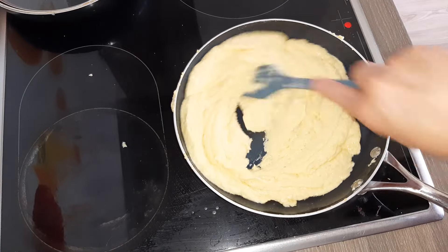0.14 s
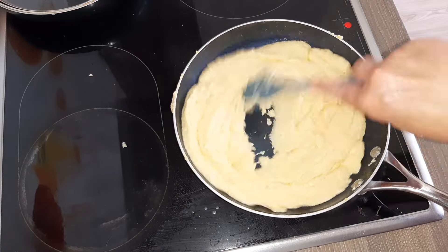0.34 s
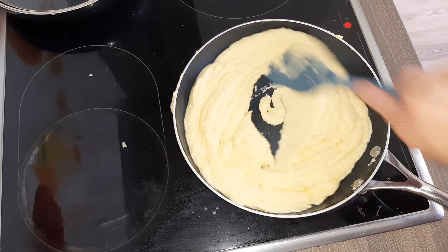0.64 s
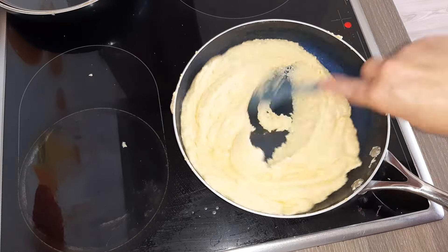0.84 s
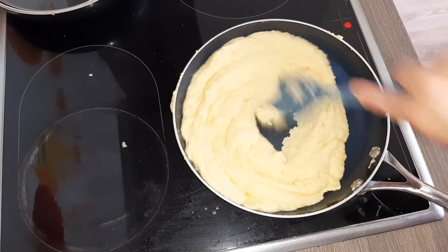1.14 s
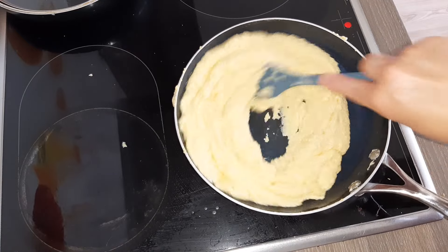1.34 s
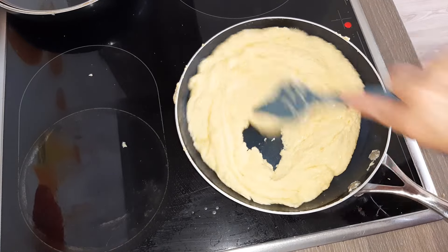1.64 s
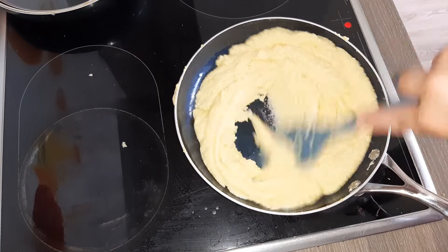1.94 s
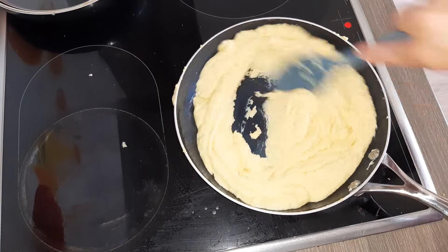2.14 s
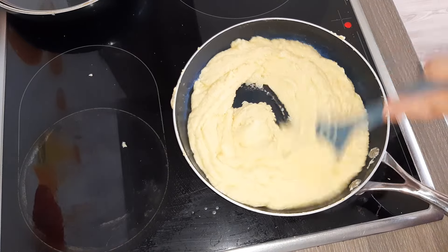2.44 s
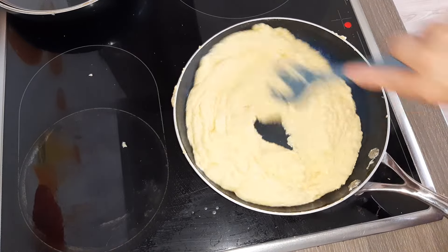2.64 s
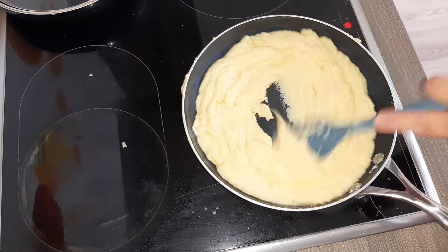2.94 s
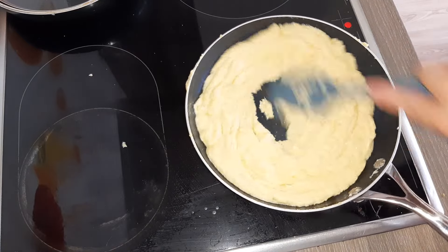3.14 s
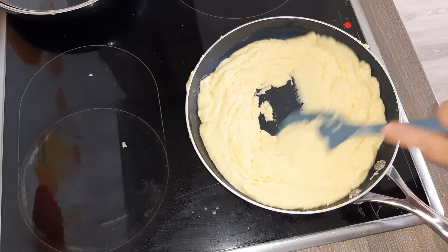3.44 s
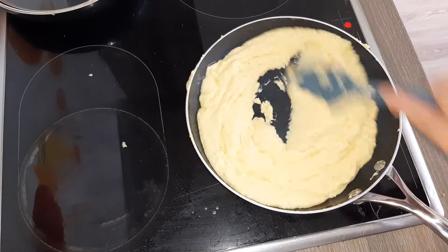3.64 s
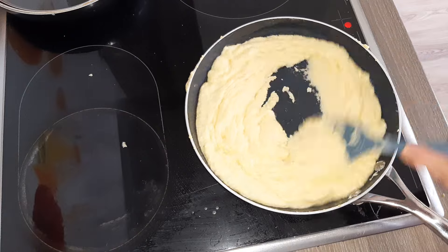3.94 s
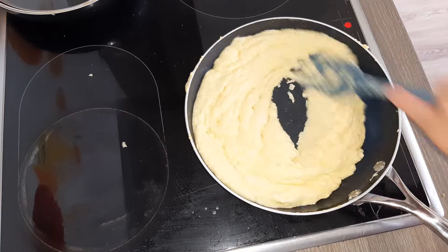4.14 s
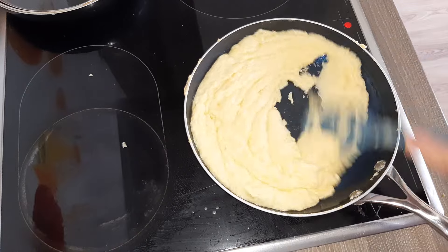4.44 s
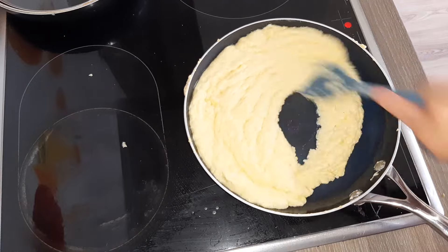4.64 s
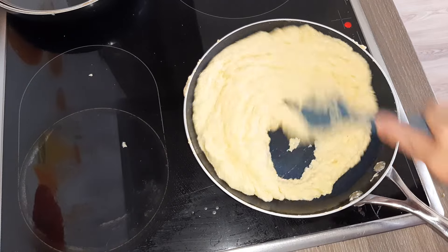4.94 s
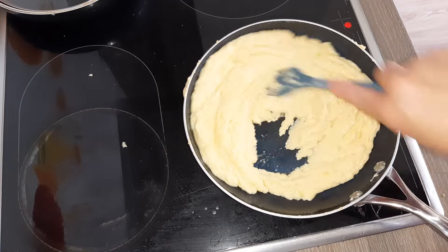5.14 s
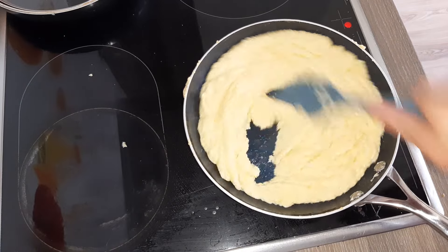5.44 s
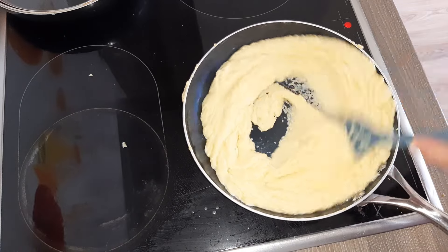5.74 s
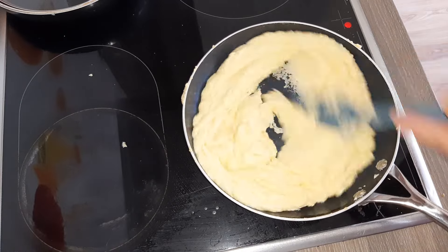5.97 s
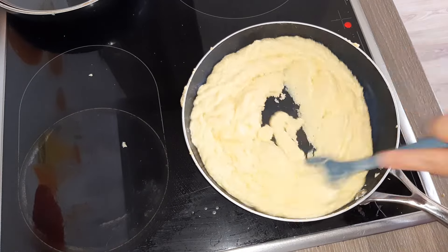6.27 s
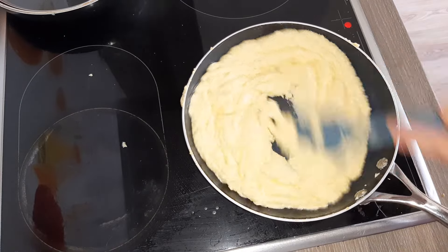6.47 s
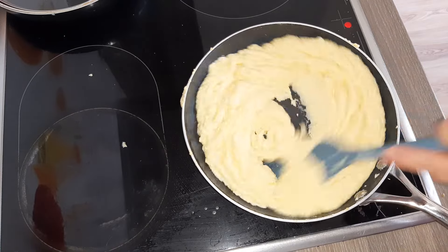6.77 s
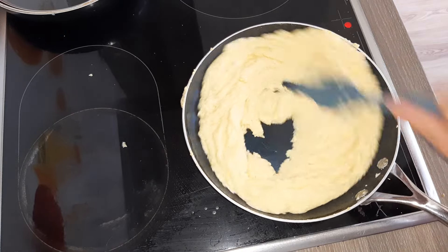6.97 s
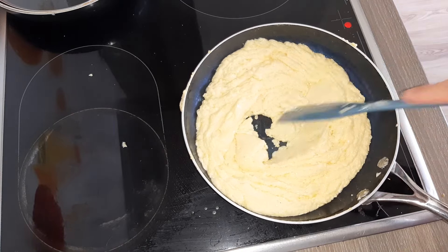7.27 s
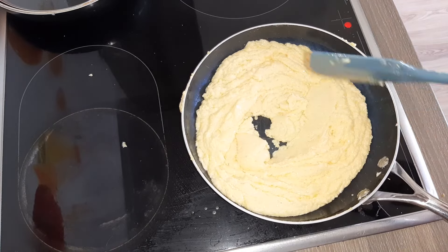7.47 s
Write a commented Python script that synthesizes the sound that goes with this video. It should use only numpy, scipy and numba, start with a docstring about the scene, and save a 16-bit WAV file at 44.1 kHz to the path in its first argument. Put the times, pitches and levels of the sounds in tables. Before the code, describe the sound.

Close stereo pickup over a hot pan in a small, quiet kitchen, with a short, faint room tail. From the first instant a soft spatula works thick porridge in rapid pushes, roughly four a second in uneven pairs. Each gives a sticky mid-pitched squelch with crackly tearing, a deeper smack and a brief bright sizzle of tiny bursts. A low pan rumble accompanies the shoves. A snappy pop comes near 1.25 s, around dull thuds at 1.1 and 1.2. Stirring continues evenly, with small pops clustering near 2.5. At 4.35 the pan lands with the hardest knock, a quick double clack, followed by softer thuds at 4.9 and 5.2. Faint airy squeaks slip out occasionally, notably near 6.1 and 7.1. Wet pops thicken after 6, the strongest at 6.7 and another at 7.2. Then the blade lifts and the last fizz dies into near silence by 7.6.

```python
"""In a small kitchen, close above a hot frying pan on a glass hob, a silicone spatula stirs thick porridge.
Each push tears the sticky mass: random clicks make the tearing, small ringing cavities make the squelch
and the pops, and clicks with short pings make the wet sizzle. Sliding tones are air squeaking out.
The dragged pan rumbles and, when it rocks, knocks: both set off the same ringing modes of the pan.
At the end the spatula is lifted and the last fizz fades into the faint air of the room."""
import sys
import numpy as np
from scipy import signal
from scipy.fft import rfft, irfft
from scipy.io import wavfile
from scipy.ndimage import uniform_filter1d
from numba import njit

SR = 44100
rng = np.random.default_rng(int(sys.argv[2]) if len(sys.argv) > 2 else 0)


def dump_mix(stems):
    """Bounce the given channels to the path in sys.argv[1] as a 16-bit WAV at rate SR."""
    frames = np.atleast_2d(stems).T  # one column per channel
    limited = np.clip(frames, -1, 1)  # hard clip at full scale
    pcm = np.round(limited * 32767).astype(np.int16)
    wavfile.write(sys.argv[1], SR, pcm)


N = 335535
TIME = np.arange(N) / SR  # seconds


def undb(db):
    """Turn decibels into a gain."""
    return 10 ** (np.asarray(db) / 20)


def unit(x):
    """Scale a sound to an rms of 1."""
    return x / np.sqrt(np.mean(x ** 2))


def curve(rows, axis=1):
    """Join one column of a table by straight lines in time."""
    rows = np.asarray(rows)
    return np.interp(TIME, rows[:, 0], rows[:, axis])


def sides(pan_db):
    """Left and right gains; a positive number of dB makes the left louder."""
    return undb(np.array([[.5], [-.5]]) * pan_db)


def add(out, at, sound):
    """Mix a short sound in at a time in seconds."""
    i = max(int(at * SR), 0)
    out[:, i:i + sound.shape[1]] += sound[:, :max(N - i, 0)]


def convolve(x, response):
    """Pass a sound through an impulse response."""
    return signal.fftconvolve(np.atleast_2d(x), np.atleast_2d(response), axes=1)[:, :N]


def low_pass(x, order, hz):
    """Dull a sound above a frequency."""
    return signal.sosfilt(signal.butter(order, hz, fs=SR, output="sos"), x)


def high_pass(x, order, hz):
    """Thin a sound below a frequency."""
    return signal.sosfilt(signal.butter(order, hz, "high", fs=SR, output="sos"), x)


def colour(x, points, size=1024):
    """Filter a sound to a spectrum of (Hz, dB) points, without any sound before its cause."""
    hz, db = np.transpose(points)
    grid = np.arange(size // 2 + 1) * SR / size
    gain = undb(np.interp(np.log(grid + 1), np.log(hz), db))
    # folding the cepstrum forward in time gives the minimum-phase response
    cepstrum = irfft(np.log(gain))
    cepstrum[1:size // 2] *= 2
    cepstrum[size // 2 + 1:] = 0
    return convolve(x, irfft(np.exp(rfft(cepstrum))))


def clicks(rate, spread_db):
    """Random clicks of either sign, rate per second, with sizes scattered in dB."""
    size = undb(spread_db * np.minimum(rng.exponential(size=N), 4))
    return (rng.random(N) < rate / SR) * size * rng.choice([-1, 1], N)


def walk(rate):
    """Random levels of rms 1, rate new ones per second, smoothed into slopes."""
    held = rng.standard_normal(8192)[(TIME * rate).astype(int) % 8192]
    return unit(uniform_filter1d(held, max(int(SR / rate), 1)))


def spurts(rate, decay_s, depth_db):
    """Gain of rms 1 that jumps at random moments and falls back within milliseconds."""
    jumps = (rng.random(N) < rate / SR) * rng.exponential(size=N)
    power = signal.lfilter([1], [1, -np.exp(-1 / (decay_s * SR))], jumps)
    return unit(np.sqrt(1 + undb(depth_db) ** 2 * power))


def swells(events, attack_s, release_s):
    """Power of (start, length, dB) gestures that rise up to the start, hold and die away."""
    power = np.zeros((1, N))
    for at, length, db in events:
        start = max(at - attack_s, 0)
        t = np.arange(int((attack_s + length + 6 * release_s) * SR)) / SR + start - at
        rise = np.clip(1 + t / attack_s, 0, 1) ** 2
        fall = np.exp(-np.maximum(t - length, 0) / release_s)
        add(power, start, (undb(db) * (rise * fall)[None]) ** 2)
    return power[0]


@njit
def bubbles(push, hz, cycles, glide, pan):
    """Every click rings a small cavity whose pitch rises as it opens."""
    out = np.zeros((2, len(push)))
    for i in np.nonzero(push)[0]:
        length, phase = int(cycles[i] * SR / hz[i]), 0.
        for k in range(min(length, len(push) - i)):
            phase += 2 * np.pi * hz[i] / SR * (1 + glide * k / length)
            v = push[i] * np.exp(-6 * k / length) * np.sin(phase) / np.hypot(pan[i], 1 / pan[i])
            out[0, i + k] += v * pan[i]
            out[1, i + k] += v / pan[i]
    return out


def splash(t60_s=0.019, wet_db=-3, size=1024):
    """Direct sound and its quick reflections in the pan, drawn afresh at every call."""
    t = np.arange(size) / SR
    early = rng.standard_normal((2, size)) * np.exp(-np.log(1000) * t / t60_s) * (t > .0003)
    response = undb(wet_db) * unit(early) / np.sqrt(size)
    response[:, 0] += 1
    return response / np.sqrt(1 + undb(wet_db) ** 2)


def wander(x, wet_db, size=1024):
    """The source moves about the pan, so overlapping slices get different reflections."""
    out, fade = np.zeros((2, N)), signal.get_window("hann", 2 * size)
    for i in range(0, N - 2 * size, size):
        piece = x[:, i:i + 2 * size] * fade
        add(out, i / SR, signal.fftconvolve(piece, splash(wet_db=wet_db), axes=1))
    return out


# The faint air of the room. Each row: frequency in Hz, relative strength in dB.
AIR_SPECTRUM = [(30, 5), (110, -0.5), (250, -0.5), (600, -14.5), (2000, -15.5), (6000, -27.5), (16000, -16)]


def room_tone(level_db=-72):
    """Steady kitchen air: coloured noise, partly shared by both sides."""
    shared = rng.standard_normal(N)
    separate = 1.3 * rng.standard_normal((2, N))
    return unit(colour(shared + separate, AIR_SPECTRUM)) * undb(level_db)


# Pushes of the blade that tear the mass and wet the hot metal. Levels are before the mix.
# Each row: start of full strength in seconds, length in seconds, tearing level in dB,
# middle pitch of the air pockets in Hz, deep smack in dB relative to the tearing, sizzle level in dB,
# top of the sizzle in dB relative to its lower part.
PUSHES = [(0.01, 0.05, -75.5, 3940, -3, -52, -8), (0.061, 0.045, -56, 2390, -8, -63, 3),
          (0.149, 0.027, -47.5, 3880, -7.5, -51, -5), (0.317, 0.013, -51.5, 3870, -11, -51.5, -9),
          (0.364, 0.042, -55.5, 2750, -10, -54.5, -4), (0.545, 0.034, -57.5, 3730, -6, -53.5, 4),
          (0.626, 0.058, -50, 3740, -6.5, -53.5, 8), (0.804, 0.014, -51, 2000, 0, -46, 4),
          (0.877, 0.048, -55, 2740, -6, -66, 0), (1.01, 0.061, -53.5, 2380, -5, -49.5, 8),
          (1.115, 0.045, -60.5, 2260, -12, -62, -5), (1.253, 0.031, -56.5, 2320, -12, -55.5, -5),
          (1.34, 0.03, -51.5, 3960, -9.5, -52.5, -1), (1.494, 0.034, -53, 2300, -8, -49.5, 3),
          (1.565, 0.045, -53, 4170, -16, -58, 10), (1.759, 0.021, -59.5, 4000, -10, -50, 6),
          (1.826, 0.057, -57, 3280, -16, -56, -3), (2.014, 0.036, -59.5, 3900, 1, -55, 4),
          (2.085, 0.086, -67.5, 3580, -11, -57, 3), (2.293, 0.028, -56.5, 2920, 0, -57.5, -2),
          (2.355, 0.027, -56, 2360, -24, -58, 3), (2.504, 0.079, -53, 1920, -1, -64, -6),
          (2.588, 0.056, -53.5, 2200, -19, -59, 1), (2.747, 0.03, -59, 4170, -5, -54, -4),
          (2.819, 0.055, -52.5, 1900, -13, -55.5, -6), (2.93, 0.12, -61, 2130, -7, -56, -2),
          (3.058, 0.072, -56, 3110, -2, -53, 0), (3.262, 0.025, -55, 4460, -8, -56.5, 5),
          (3.326, 0.048, -52, 2610, -7.5, -54, 2), (3.525, 0.028, -59.5, 3400, -9, -57, -4),
          (3.59, 0.042, -57.5, 2580, -28, -59, 6), (3.747, 0.049, -58, 2100, -5, -55, 1),
          (3.849, 0.062, -53.5, 2820, -2.5, -54.5, -4), (4.034, 0.01, -53, 2970, 0.5, -55, -8),
          (4.112, 0.039, -57.5, 2220, -7, -60, 3), (4.309, 0.12, -55, 2070, -3.5, -59, -3),
          (4.53, 0.063, -53, 2000, -1.5, -53, -1), (4.625, 0.063, -55, 2370, -10, -55.5, -6),
          (4.783, 0.042, -53, 3290, -10.5, -57, -1), (4.915, 0.016, -49, 2250, 1, -60, -1),
          (5.052, 0.023, -55.5, 2920, -14, -53.5, 8), (5.11, 0.068, -57.5, 2310, -28, -63, -12),
          (5.293, 0.03, -63.5, 2870, -21, -51, 7), (5.342, 0.059, -54.5, 2840, -2, -59.5, -4),
          (5.574, 0.036, -55.5, 2160, -3, -53, 5), (5.638, 0.032, -52.5, 3800, -12, -51, -4),
          (5.843, 0.028, -55.5, 2140, 1.5, -53.5, -4), (5.905, 0.061, -56.5, 1900, -3, -54.5, 0),
          (6.066, 0.15, -61, 2020, -8.5, -55, -2), (6.262, 0.088, -72.5, 4440, 7, -52.5, 1),
          (6.349, 0.1, -57, 2170, -0.5, -67, 1), (6.513, 0.089, -60.5, 4260, -8, -52, 1),
          (6.649, 0.065, -53.5, 2370, -10, -50.5, -3), (6.834, 0.043, -55.5, 2790, -6.5, -55, -3),
          (6.913, 0.032, -48.5, 3730, -10, -50.5, 0), (7.005, 0.043, -60, 3050, -6.5, -57.5, 13),
          (7.104, 0.047, -55.5, 2120, -21, -56.5, -5), (7.18, 0.053, -56, 2100, -5.5, -55, 3)]


def pocket_pitch(rise_oct_per_s=1.1):
    """Every tear has its own resonance, which rises while it opens."""
    points = []
    for at, length, _, hz, *_ in PUSHES:
        rise = 2 ** (rise_oct_per_s * length / 2)
        points += [(at, hz / rise), (at + length, hz * rise)]
    return curve(sorted(points))


def air_pockets(rate, cycles, scatter, glide=0.17):
    """Small cavities ring around the pitch of the push, each gliding up as it opens."""
    hz = np.clip(pocket_pitch() * np.exp(scatter * rng.standard_normal(N)), 400, 12000)
    lengths = cycles * np.exp(0.26 * rng.standard_normal(N))
    pushes = clicks(rate, spread_db=4.0)
    return unit(bubbles(pushes, hz, lengths, float(glide), undb(9.7 * rng.standard_normal(N))))


# What goes on between the pushes until the spatula is lifted, before the offsets and the mix.
# Each row: time in seconds, sizzle level in dB, tearing level in dB.
BETWEEN_PUSHES = [(0.0, -60, -58.5), (0.36, -58, -64.5), (0.97, -55.5, -61.5), (2.2, -64.5, -65.5),
                  (2.64, -54.5, -64.5), (2.94, -56.5, -57.5), (3.37, -61.5, -68), (4.8, -53.5, -64.5),
                  (5.42, -62.5, -71), (6.03, -55.5, -65), (6.73, -56.5, -61.5), (7.09, -56, -81),
                  (7.37, -68.5, -76), (7.6, -101, -95)]
# Tone of the snapping threads. Each row: frequency in Hz, relative strength in dB.
TEAR_SPECTRUM = [(300, -21), (700, -22.5), (1200, -14), (2100, 2), (3000, -6), (4300, -2.5), (6500, -26.5),
                 (12000, -31.5)]
# Tone of the deep smack. Each row: frequency in Hz, relative strength in dB.
SMACK_SPECTRUM = [(120, -4.5), (300, -15.5), (500, -8), (750, -1.5), (1050, 3), (1500, -6), (3000, -31)]


def squelch(tear_db=-0.5, pocket_db=-3, smack_db=-2, clump_db=0.1):
    """Sticky threads snap in clumps, air pockets open, and a deep cut smacks."""
    attack_s, release_s = 0.023, 0.018  # a tear builds up, holds while the blade pushes, and stops
    at, length, db, _, deep_db, _, _ = np.transpose(PUSHES)
    lull = undb(curve(BETWEEN_PUSHES, axis=2) - 4)
    deep_lull = lull * undb(-1)
    tearing = np.sqrt(swells(zip(at, length, db), attack_s, release_s) + lull ** 2)
    cutting = np.sqrt(swells(zip(at, length, db + deep_db), attack_s, release_s) + deep_lull ** 2)
    tears = undb(tear_db) * unit(colour(clicks(2600, spread_db=5.0), TEAR_SPECTRUM))
    pockets = undb(pocket_db) * air_pockets(rate=1400, cycles=12.3, scatter=0.24)
    smack = undb(smack_db) * unit(colour(clicks(1600, spread_db=3.5), SMACK_SPECTRUM))
    mass = ((tears + pockets) * tearing + smack * cutting) * undb(clump_db * walk(110))
    mass = mass * spurts(rate=70, decay_s=0.0031, depth_db=6)
    return wander(mass * sides(2.75), wet_db=1.5)


# Tone of the sizzle. Each row: frequency in Hz, relative strength in dB.
SIZZLE_SPECTRUM = [(800, -26), (2500, -10.5), (4500, -1.5), (6000, -1.5), (8000, -3), (11500, -1),
                   (14000, -3), (16000, -13)]


def sizzle(level_db=0, rate=3500, apart=3.2, flicker_db=2.04, ping_db=-7, split_hz=9800):
    """Tiny steam bubbles burst as clicks all over the pan, most around each push; some of them ping."""
    at, length, _, _, _, db, top_db = np.transpose(PUSHES)
    lull = undb(curve(BETWEEN_PUSHES) - 1)

    def steam(levels):
        """Freshly wetted metal hisses up, and stops when porridge flows back over it."""
        return np.sqrt(swells(zip(at, length, levels), attack_s=0.075, release_s=0.0033) + lull ** 2)

    middle, left, right = (clicks(rate, spread_db=2.5) for _ in range(3))
    bursts = unit(middle + apart * np.array([left, right]))
    hz = rng.uniform(4000, 15000, N)
    ping_clicks = clicks(500, spread_db=0.0)
    pings = bubbles(ping_clicks, hz, np.full(N, 14.), 0.044, undb(17.0 * rng.standard_normal(N)))
    fizz = unit(colour(bursts + undb(ping_db) * unit(pings), SIZZLE_SPECTRUM))
    # the top and the lower part of the sizzle follow their own levels
    lower = signal.sosfiltfilt(signal.butter(2, split_hz, fs=SR, output="sos"), fizz)
    fizz = lower * steam(db - top_db / 2) + (fizz - lower) * steam(db + top_db / 2)
    fizz = fizz * spurts(rate=63, decay_s=0.0044, depth_db=1.5)
    return wander(fizz * undb(level_db + flicker_db * walk(90)) * sides(1.9), wet_db=1)


# How the pan rings on the glass plate, before any damping.
# Each row: frequency in Hz, relative level in dB, time to fall by 60 dB in seconds.
PAN_MODES = [(42, -22, 0.32), (66.7, -6.5, 0.38), (76.5, -13, 0.28), (109.4, 1, 0.29), (129.7, -1.5, 0.23),
             (152, -11, 0.16), (191.5, -6, 0.15), (242.6, -10.5, 0.21), (287.7, -5, 0.14),
             (336.5, -7, 0.11), (390, -6, 0.027), (484.5, -5.5, 0.11), (537.6, -11.5, 0.25),
             (622, -2.5, 0.056), (748, -15, .12), (870, -24, 0.15), (1064, -8, 0.058), (4040, -32, 0.13)]


def pan_ring(left_db=5.3, lag=.3, size=22050):
    """Ringing of the pan; neighbouring modes swing in opposite directions, the right lags (radians)."""
    t, phase = np.arange(size) / SR, np.array([[0], [lag]])
    ring = np.zeros((2, size))
    for k, (hz, db, t60) in enumerate(PAN_MODES):
        swing = (-1) ** k * undb(db) * np.sin(2 * np.pi * hz * t - phase)
        ring += swing * np.exp(-np.log(1000) * t / t60)
    return ring * sides(left_db)


def damped(ring, damping_s):
    """The ring of the pan stilled faster by what touches it."""
    return ring * np.exp(-TIME[:ring.shape[1]] / damping_s)


# The blade drags the pan over the hob.
# Each row: start of full strength in seconds, length in seconds, level in dB.
DRAGS = [(0.01, 0.058, -59), (0.15, 0.1, -63.5), (0.345, 0.16, -59), (0.66, 0.039, -57.5),
         (0.83, 0.21, -64), (1.09, 0.22, -63), (1.525, 0.11, -62.5), (1.77, 0.016, -63),
         (1.865, 0.063, -62), (2.26, 0.24, -70.5), (2.51, 0.21, -63.5), (2.77, 0.15, -61.5),
         (3.115, 0.038, -66), (3.37, 0.031, -59.5), (3.775, 0.04, -64.5), (3.87, 0.099, -60),
         (4.13, 0.041, -61), (4.55, 0.068, -58), (5.27, 0.07, -63), (5.665, 0.082, -60.5),
         (5.93, 0.15, -60.5), (6.18, 0.16, -67), (6.415, 0.1, -59), (6.945, 0.06, -59.5),
         (7.195, 0.028, -57.5), (7.435, 0.013, -64.5)]


def rumble(ring, level_db=0, soft_hz=120):
    """The soft blade sticks and slips on the base, hardest in the shoves; hand and porridge damp the ring."""
    slips = low_pass(clicks(300, spread_db=-2), 1, soft_hz)
    body = unit(convolve(slips, damped(ring, damping_s=0.13)))
    lull = undb(curve(BETWEEN_PUSHES, axis=2) - 6.5)
    drag = np.sqrt(swells(DRAGS, attack_s=.04, release_s=0.029) + lull ** 2)
    return body * drag * undb(level_db)


def cavity(x, hz, q=3.4, soft_hz=4300):
    """A small cavity rings at its pitch, radiates little below it, and soft walls dull the top."""
    x = high_pass(x, 6, min(0.61 * hz, SR / 3))
    ring = signal.lfilter(*signal.iirpeak(min(hz, SR / 3), q, fs=SR), x)
    return ring + undb(-8.5) * low_pass(x, 3, soft_hz)


# The loudest short cracks: bursting pockets, blade slaps, brief clumps of tearing,
# and the crack of a pan knock. Levels are before the mix.
# Each row: time in seconds, ringing pitch in Hz, ringing level in dB, snap level in dB,
# left minus right in dB, fading time of the crackle in seconds.
SHORT_CRACKS = [(0.039, 6730, -40.5, -70, -2, 0.00066), (0.155, 2700, -42, -43, 3, 0.0026),
                (0.324, 2340, -51.5, -44.5, 1, 0.00092), (0.384, 2270, -45.5, -59, 3, 0.0034),
                (0.646, 4870, -41.5, -51, 0, 0.0048), (0.814, 1780, -43.5, -57, 7, 0.017),
                (1.052, 1600, -47, -64, 2, 0.0045), (1.076, 3900, -43.5, -65, -2, 0.0028),
                (1.247, 2210, -38, -34, 2, 0.0011), (1.507, 1080, -52, -52, 3, 0.011),
                (1.57, 4230, -59, -45.5, -4, 0.015), (1.7603, 4870, -50, -43.5, 0, 0.0057),
                (2.016, 4440, -59, -51.5, 3, .0014), (2.317, 2560, -42, -69, 3, .003),
                (2.459, 2360, -50.5, -49, 5.5, 0.017), (2.493, 2450, -56, -44, 2, 0.0022),
                (2.5, 2470, -45, -47.5, 4, 0.017), (2.518, 3480, -43, -58, 3, 0.0068),
                (2.555, 1680, -47.5, -68, 0, 0.0025), (2.617, 1960, -39.5, -48.5, 0, 0.00095),
                (2.754, 6300, -42.5, -54, 1, 0.0053), (2.829, 1770, -42.5, -64, -2, 0.0083),
                (3.065, 5320, -46.5, -66, -2, .002), (3.091, 2640, -66, -45, -4, 0.0019),
                (3.272, 4150, -49, -62, 0, 0.0037), (3.794, 1960, -50, -68, 4, 0.0023),
                (3.865, 2170, -45.5, -58, -3, 0.0044), (3.895, 1110, -41, -70, 4, 0.0022),
                (4.043, 2070, -47, -49, 3, 0.0033), (4.127, 1010, -45.5, -53, -1, 0.0015),
                (4.342, 960, -43.5, -60, 3, 0.014), (4.392, 1000, -38, -41, -1.5, 0.0026),
                (4.437, 3780, -60, -48.5, 6, 0.0033), (4.679, 870, -40.5, -63, 2, 0.0044),
                (4.9156, 1040, -43, -43.5, -1, 0.0041), (5.062, 2650, -45.5, -56, 3, 0.0023),
                (5.306, 2670, -50, -61, 5, .0025), (5.854, 1950, -48, -64, 5, 0.0085),
                (5.904, 3500, -71, -49, -2, 0.0022), (5.418, 940, -46.5, -55, 4, 0.0018),
                (5.926, 1750, -45, -45, 0, 0.0055), (5.984, 1730, -46.5, -69, -2, 0.0032),
                (6.098, 1890, -47, -50, 7, 0.0028), (6.158, 5650, -53, -48, 0, 0.0029),
                (6.177, 2200, -44.5, -46, 3, 0.026), (6.407, 940, -46.5, -45, 0, 0.0063),
                (6.42, 2180, -39, -49, -1, 0.0012), (6.4557, 1610, -48, -43.5, 1, 0.0021),
                (6.521, 6040, -45.5, -55, 6, 0.0023), (6.648, 1760, -63, -47, -3, .003),
                (6.672, 2950, -47, -52, -1, 0.0037), (6.7099, 1390, -31.5, -37, 1, 0.0016),
                (6.714, 2600, -36.5, -37.5, 6, 0.0012), (6.8443, 5860, -47, -61, -1, 0.0022),
                (6.992, 1320, -48, -52, 0, 0.0013), (7.183, 1570, -32.5, -45, 2, 0.00033)]
# Tone of the snap. Each row: frequency in Hz, relative strength in dB.
SNAP_SPECTRUM = [(1000, -23), (2500, -9), (4000, 8.5), (5500, 4), (8000, 2), (12000, 4.5), (16000, -3.5)]


def pops(ring_db=-6, snap_db=-6, crackle_db=-13, size=1024):
    """Each short crack is a snap with a crackle fading in milliseconds, plus a ring at its own pitch."""
    rings, snaps, t = np.zeros((2, N)), np.zeros((2, N)), np.arange(size) / SR
    for at, hz, low_db, high_db, pan_db, fade_s in SHORT_CRACKS:
        crackle = rng.standard_normal(size) * (rng.random(size) < .3)
        burst = undb(crackle_db) * crackle * np.exp(-t / fade_s)
        burst[0] = 1  # the snap itself
        burst = convolve(burst, splash(wet_db=0))[:, :size]
        add(rings, at, unit(cavity(burst, hz)) * undb(low_db + ring_db) * sides(pan_db))
        add(snaps, at, unit(burst) * undb(high_db + snap_db) * sides(pan_db))
    return rings + colour(snaps, SNAP_SPECTRUM)


# The pan rocks and lands on the hob; levels are before the mix.
# Each row: time in seconds, level in dB, contact time in seconds.
LANDINGS = [(0.383, -52, 0.0048), (1.088, -39, 0.012), (1.149, -50, 0.0057), (1.206, -40, 0.014),
            (2.637, -50.5, 0.0031), (2.755, -52.5, 0.0017), (3.865, -49, 0.0028), (4.34, -25.5, 0.00091),
            (4.350, -44, 0.00079), (4.39, -30, 0.0057), (4.451, -43.5, 0.0034), (4.918, -39.5, 0.0045),
            (4.973, -46.5, 0.0036), (5.177, -32.5, 0.014), (5.225, -48, 0.012), (5.276, -53, 0.0088),
            (5.927, -59, 0.0033), (6.714, -49, 0.003), (7.19, -62, 0.0054)]


def knocks(ring, level_db=-1):
    """The pan lands on the glass; a longer contact gives a duller thud, and the hand stills the ring."""
    pushes = np.zeros((1, N))
    for at, db, contact in LANDINGS:
        push = np.hanning(int(contact * SR) + 2)
        add(pushes, at, undb(db + level_db) * push[None] / push.sum())
    return convolve(pushes, damped(ring, damping_s=0.18))


# Trapped air squeezed out under the blade; levels are before the mix.
# Each row: start in seconds, length in seconds, first pitch in Hz, last pitch in Hz, level in dB.
AIR_SQUEAKS = [(0.445, .055, 1290, 2010, -63), (2.161, 0.14, 950, 796, -71),
               (5.693, 0.07, 1530, 1816, -63.5), (6.121, 0.034, 2090, 1800, -55),
               (7.057, 0.017, 1870, 1990, -61), (7.113, 0.021, 2093, 2105, -51)]


def squeaks(level_db=0, width_hz=90):
    """Air flutters through a narrow wet slit: narrow noise around a sliding resonance."""
    out = np.zeros((2, N))
    for at, length, start_hz, end_hz, db in AIR_SQUEAKS:
        count = int(length * SR)
        noise = rng.standard_normal(count) + 1j * rng.standard_normal(count)
        flutter = signal.lfilter([1], [1, -np.exp(-np.pi * width_hz / SR)], noise)
        turns = np.cumsum(np.linspace(start_hz, end_hz, count)) / SR
        tone = np.real(flutter * np.exp(2j * np.pi * turns))
        add(out, at, unit(tone * np.hanning(count)) * undb(db + level_db) * sides(4.5))
    return out


def kitchen(x, tail_db=-10, t60=0.26, size=16384):
    """Add the short tail of the room: fading noise, strongest in the low middle."""
    t = np.arange(size) / SR
    tail = rng.standard_normal((2, size)) * np.exp(-np.log(1000) * t / t60) * (t > .006)
    tail = colour(tail, [(120, -4.5), (400, -4.0), (2000, -8), (6000, -9), (16000, -8.5)])[:, :size]
    return x + convolve(x, undb(tail_db) * unit(tail) / np.sqrt(size))


def scene():
    """Porridge and pan in the kitchen."""
    left, right = (squelch() + sizzle() + pops() + squeaks()) * undb(-2)
    porridge = np.array([np.roll(left, 1), right])  # reaches the left microphone one sample later
    ring = pan_ring()
    return kitchen(porridge + rumble(ring) + knocks(ring)) + room_tone()


def record(dry):
    """Drop the deepest bass and everything above about 16 kHz."""
    dry = high_pass(dry, 4, 40)
    return signal.sosfilt(signal.ellip(10, .2, 70, 16150, fs=SR, output="sos"), dry)


dry = scene()
out = record(dry)
dump_mix(out)
```